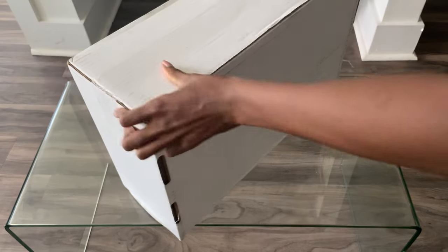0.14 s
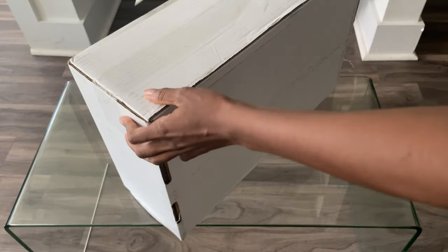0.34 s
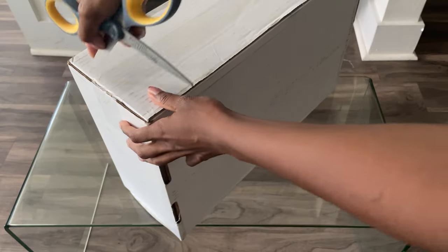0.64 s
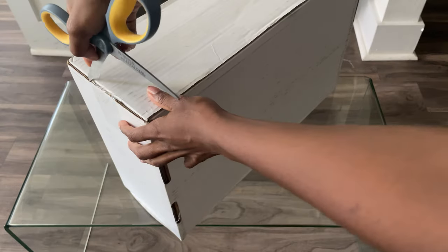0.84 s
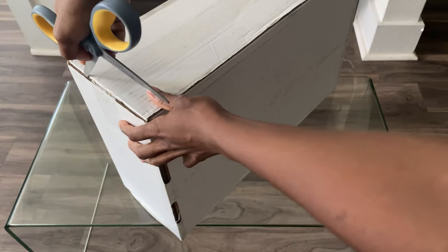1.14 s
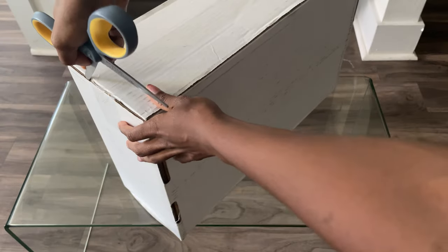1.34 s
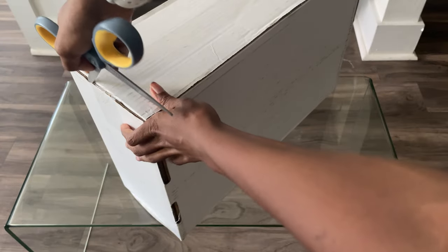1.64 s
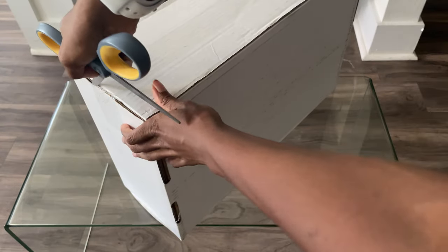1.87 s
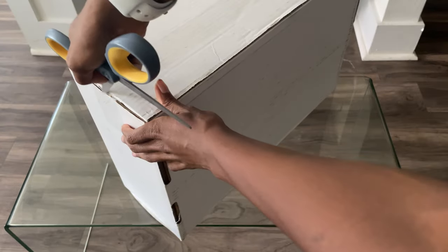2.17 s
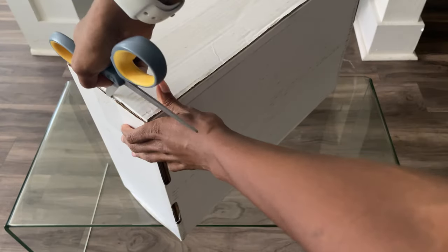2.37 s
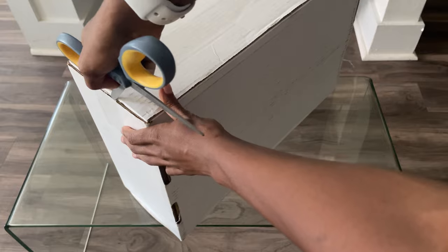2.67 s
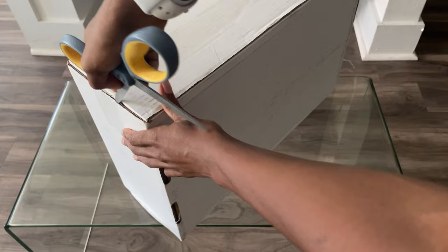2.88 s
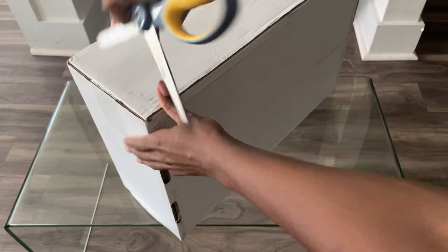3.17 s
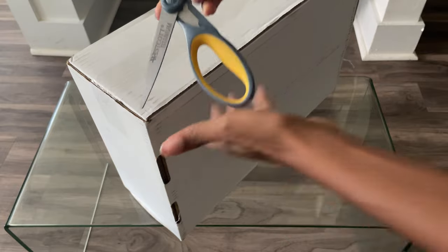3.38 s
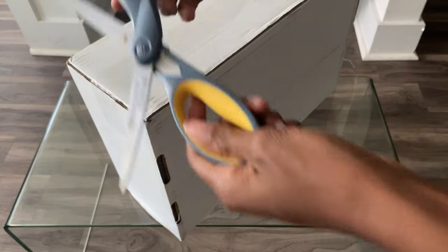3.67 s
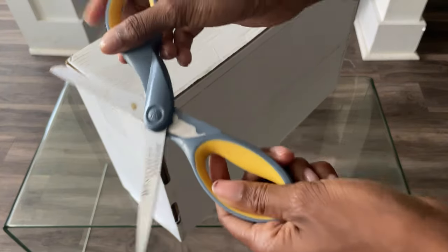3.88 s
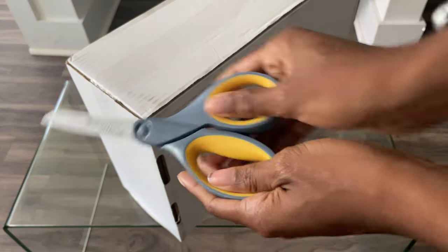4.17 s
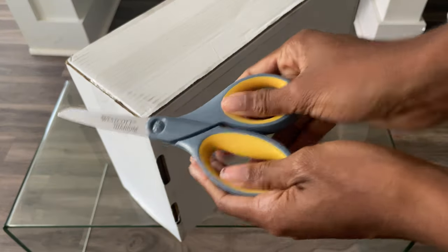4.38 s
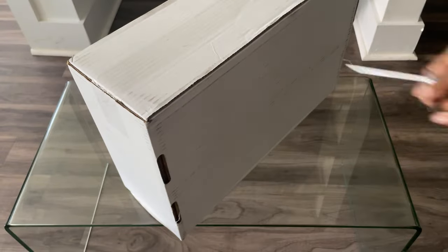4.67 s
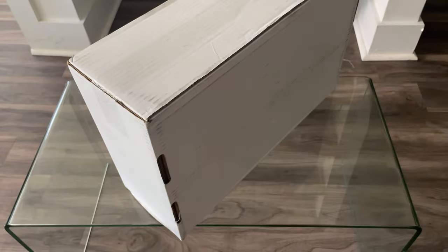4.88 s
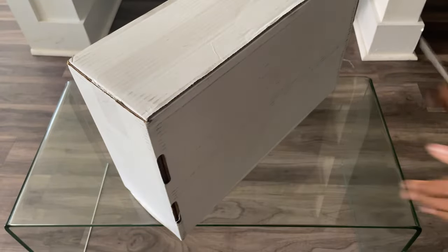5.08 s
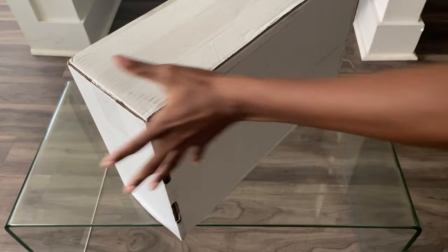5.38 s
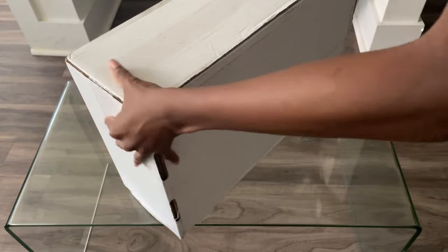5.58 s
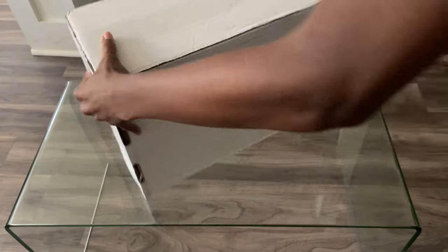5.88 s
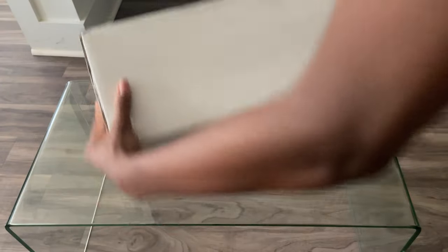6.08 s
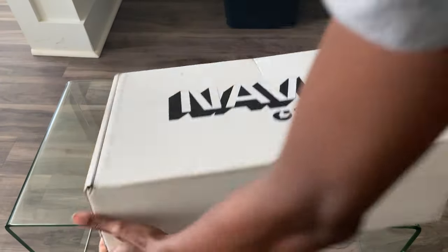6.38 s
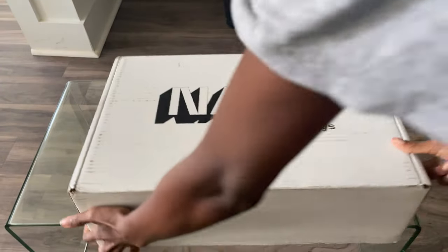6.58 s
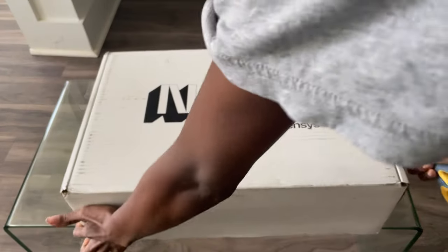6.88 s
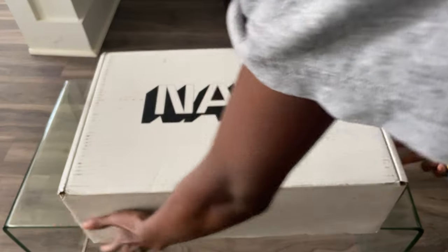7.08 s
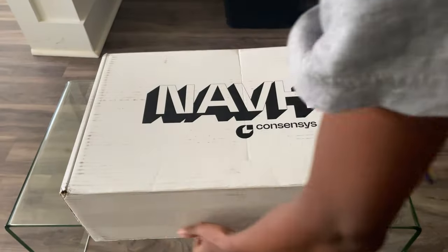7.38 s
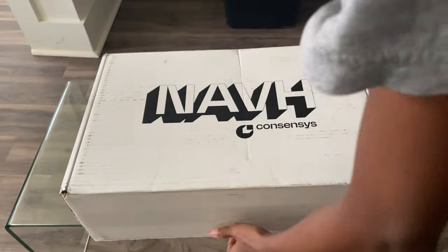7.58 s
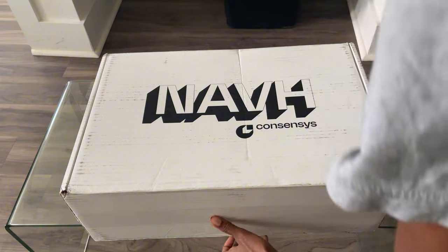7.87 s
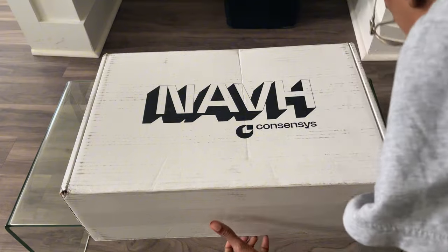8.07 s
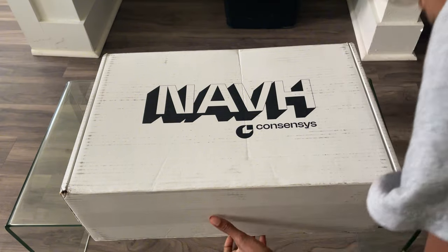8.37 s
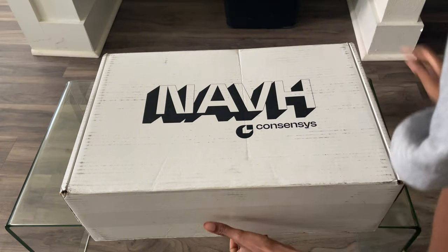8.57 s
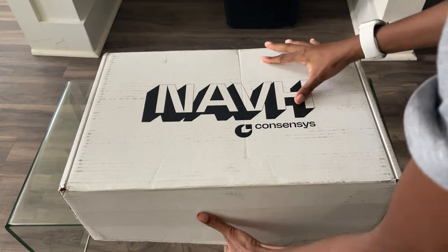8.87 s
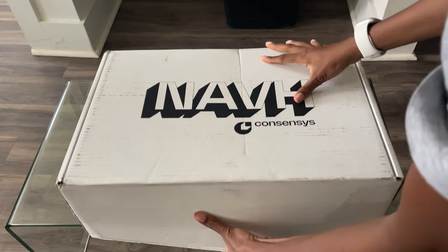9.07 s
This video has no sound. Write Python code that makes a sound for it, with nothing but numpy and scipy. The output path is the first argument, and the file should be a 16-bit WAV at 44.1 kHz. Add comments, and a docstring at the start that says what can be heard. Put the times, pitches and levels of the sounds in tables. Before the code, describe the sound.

Scissor blade rasps and snaps through tape on a cardboard box, scissors snip shut, then the hollow box is tipped, scraped and patted indoors.

```python
"""A small quiet room with a cardboard box on a glass table: a scissor blade saws through the tape, the
scissors snap shut, and hands tip, slide and pat the box. Stick-slip grains and blows drive modal filters for
board, hollow box and blades; clicks are short noise bursts. A faint falling whistle, room echoes, ventilation
noise and a hum surround them, heard by a phone whose two ports sit a little apart."""
import sys
import numpy as np
from scipy import signal
from scipy.fft import rfft, irfft, next_fast_len
from scipy.io import wavfile
from scipy.ndimage import uniform_filter1d

SR = 44100
rng = np.random.default_rng(int(sys.argv[2]) if len(sys.argv) > 2 else 0)


def transcribe(signal):
    """Save signal, clipped to [-1, 1], as a 16-bit WAV file at the path in sys.argv[1]."""
    frames = np.atleast_2d(signal).T
    limited = np.clip(frames, -1, 1)
    pcm = np.round(limited * 32767).astype(np.int16)
    wavfile.write(sys.argv[1], SR, pcm)


N = 407484
T = np.arange(N) / SR
SIZE = next_fast_len(N + SR)


def undb(db):
    """Level law: amplitude is ten to the power dB / 20."""
    return 10 ** (np.asarray(db) / 20)


def unit(x):
    """Normalisation to unit rms."""
    return x / np.sqrt(np.mean(x ** 2))


def over_hz(table):
    """Logarithmic frequency scale: a (frequency, value) table read at every spectral bin."""
    hz, value = np.transpose(table)
    bin_hz = np.arange(1, SIZE // 2 + 2) * SR / SIZE
    return np.interp(np.log(bin_hz), np.log(np.maximum(hz, 1)), value)


def shape(x, gain):
    """Linear filtering: the spectrum is multiplied by a gain."""
    return irfft(rfft(x, SIZE) * gain, SIZE)[..., :N]


def low_pass(x, order, hz):
    """Butterworth low-pass filtering."""
    return signal.sosfilt(signal.butter(order, hz, fs=SR, output="sos"), x)


def flicker(rate, depth_db):
    """Random modulation: a gain that drifts between random levels drawn at the given rate [Hz]."""
    k = int(SR / rate)
    steps = np.repeat(rng.standard_normal(N // k + 1), k)
    return undb(depth_db * uniform_filter1d(steps, k)[:N])


def resonate(x, peaks, patchy_db=0):
    """Modal superposition: two-pole resonances of alternate sign, favoured in turn by a moving contact."""
    out = 0
    for k, (hz, width, db) in enumerate(peaks):
        drive = x * flicker(rate=45., depth_db=patchy_db)
        out = out + (-1) ** k * undb(db) * signal.lfilter(*signal.iirpeak(hz, hz / width, SR), drive)
    return out


def add(out, s, sound):
    """Superposition: a sound is added in place from time s [s]."""
    i = max(int(s * SR), 0)
    out[i:i + len(sound)] += sound[:N - i]


def grains(per_s, scatter_db, smooth):
    """Stick-slip force: random slips of uneven size over a fine even grain."""
    size = undb(scatter_db * np.minimum(rng.exponential(size=N), 2)) * rng.standard_normal(N)
    slips = unit(size * (rng.random(N) < per_s / SR))
    return unit(slips + smooth * rng.standard_normal(N))


# steady handling: (time [s], rubbing of hands and blade on the surface [dB], working of the panels [dB])
HANDLING_CURVE = [(0, -75.5, -68.5), (.14, -72, -66), (.225, -58, -69), (.3, -67, -69.5), (.41, -79, -62),
                  (.46, -92, -77.5), (.82, -86, -63), (1.57, -78, -64.5), (1.67, -72, -61),
                  (2.13, -66, -56.5), (2.42, -70.5, -61.5), (2.68, -87, -75), (2.9, -63, -54.5),
                  (3.05, -83, -66.5), (3.4, -91.5, -75.5), (4.248, -89, -73.5), (4.35, -97, -74),
                  (4.6, -76, -72.5), (4.9, -97, -72.5), (5.4, -84, -74.5), (5.458, -67, -73),
                  (5.6, -72.5, -62), (5.74, -58, -53), (5.94, -67.5, -61), (6.28, -59, -53),
                  (6.45, -67, -53.5), (6.6, -68, -54.5), (6.72, -68, -52.5), (6.77, -100, -67),
                  (7.0, -65.5, -71), (7.2, -68.5, -76), (7.36, -64.5, -61), (7.5, -70, -66.5),
                  (7.59, -75.5, -74.5), (7.9, -71, -68), (8.05, -85.5, -77), (8.2, -93, -58),
                  (8.44, -90, -49.5), (8.57, -100, -52.5), (8.62, -79.5, -59), (8.75, -76.5, -64),
                  (8.85, -61, -51), (9.01, -68, -52.5), (9.14, -70, -48.5), (9.24, -79.5, -79)]
# Strokes share the columns (time [s], peak hiss level [dB], load on the box re hiss [dB],
# decay time to -60 dB [s], rise time [s], optional).
# blade pushed through the tape
BLADE_CUTS = [(1.255, -46, 9, 0.14, .01), (1.572, -33, -6, 0.069, .009), (1.599, -46.5, 6.5, 0.35, .004),
              (1.724, -38, -1.5, 0.2, .016), (1.748, -40, 3, .14, .014), (1.769, -47, 12.5, 0.18, .01),
              (1.894, -46, 4.5, 0.12, .006), (1.923, -37.5, -1, 0.17, .012), (1.96, -48, 3, .3, .02),
              (2.028, -44, -2, 0.2, .004), (2.036, -39, 2, .16, .022), (2.165, -35.5, -1, 0.12, .018),
              (2.3, -44, 1.5, 0.18, .03), (2.43, -46, 4, 0.17, .014), (2.592, -43, 2, 0.12, .016),
              (2.63, -39, 3, 0.13, .021), (2.82, -42, 4, 0.21, .016), (2.869, -48, 8, 0.1, .015),
              (2.948, -43.5, -13, 0.22, .002)]
# hands slipping on the box; the row at 4.495 s is fingers shifting on the scissor handles
HAND_RUBS = [(.042, -49, -18, 0.12), (.149, -69, 15, .17), (.35, -62, 7, .25), (.38, -57.5, 6, 0.23),
             (.39, -52, 5, 0.086, .022), (.896, -59, 5, 0.2), (.915, -57.5, 7.5, 0.18),
             (4.495, -63.5, -10, 1), (5.526, -49.5, 9, 0.11), (5.592, -50, -4, 0.38, .02),
             (5.78, -48, 2, .2, .04), (5.815, -43, 3, .13, .03), (6.175, -51, 4, .3),
             (6.2, -47, 2, 0.32, .02), (6.3, -53, 6, .25), (6.369, -49, 5, 0.16),
             (6.425, -48, 3.5, 0.18, .015), (6.637, -52, 9, .2), (6.654, -48, 4, 0.37),
             (6.68, -49, 2, .12, .02), (6.96, -59.5, 8.5, 0.16), (7.643, -52.5, -3, 0.16),
             (7.847, -50, -13, 0.058), (8.783, -46, 6, 0.25), (9.06, -48, 21.5, 0.13),
             (9.1, -52.5, 24, 0.13)]
# fingers shifting on the scissor handles, thin and bright
FINGER_GRIPS = [(3.139, -68, -7, 0.98), (3.639, -81.5, 12, 0.56, .01), (3.93, -76, 3.5, 1, .02),
                (4.86, -78, -1, 0.48, .01), (5.0, -79, 1.5, 0.7, .02)]
# dull scrapes and rubs without sizzle, short and long; their hiss column sets the judder
DULL_SCRAPES = [(7.25, -63, 11.5, 0.4), (7.3, -61, 5, 0.36), (7.35, -58, 10.5, 0.18),
                (8.062, -38.5, -5.5, 0.37), (8.16, -54, 2, 1), (8.269, -39, 5, 0.35),
                (8.357, -41, 7, 0.082), (8.374, -33.5, -15, 0.32), (8.4, -41, 4.5, .3),
                (8.44, -43.5, 6.5, 0.43), (8.475, -48.5, 12, 0.38, .025), (8.53, -51.5, 10.5, 0.26),
                (8.93, -53, -5, 0.18), (8.955, -52, -7, 0.092), (9.038, -47.5, -2, .1)]
# per kind: (lag of the panels [s], sizzle re hiss [dB], rasp re hiss at no load [dB], rasp per load [dB/dB])
CUT_KIND, RUB_KIND = (.01, -0.5, -9, 0.74), (.002, 0.5, -2, 0.85)
GRIP_KIND, DULL_KIND = (.001, 11.5, 3, 1), (.002, -30, 3, 0.46)
RISE_S = .003  # where a row gives none
CREST_DB = 9  # peak over rms of a slipping contact
RUB_SIZZLE_DB, PANEL_RASP_DB = 2, -5.5  # sizzle re rubbing; rasp re the mean of both controls


def contact_powers():
    """Addition of powers: handling and strokes sum to six rows, hiss, sizzle, rasp, rumble, judder, boom."""
    s, rub_db, panel_db = np.transpose(HANDLING_CURVE)
    rasp_db = (rub_db + panel_db) / 2 + PANEL_RASP_DB
    steady = [undb(2 * np.interp(T, s, db)) for db in (rub_db, rub_db + RUB_SIZZLE_DB, rasp_db, panel_db)]
    power = np.vstack([steady, np.zeros((2, N))])
    hiss, sizzle, rasp, rumble, judder, boom = power
    surface, dull = (hiss, sizzle, rasp, rumble), (judder, sizzle, rasp, boom)
    for table, kind, rows in ((BLADE_CUTS, CUT_KIND, surface), (HAND_RUBS, RUB_KIND, surface),
                              (FINGER_GRIPS, GRIP_KIND, surface), (DULL_SCRAPES, DULL_KIND, dull)):
        lag, sizzle_db, rasp_db, per_load = kind
        for start, db, load_db, t60, *slow in table:
            rise = max(sum(slow) or RISE_S, .001)
            t = np.arange(int((rise + t60) * SR)) / SR
            swell = np.minimum(t / rise, 1) ** 2 * undb(-120 * np.maximum(t - rise, 0) / t60)
            shares_db = (0, sizzle_db, rasp_db + per_load * load_db, load_db)
            for row, share_db, late in zip(rows, shares_db, (0, 0, 0, lag)):
                add(row, start + late, swell * undb(2 * (db + share_db - CREST_DB)))
    return power


# spectrum of fibre hiss: (frequency [Hz], relative level per Hz [dB])
FIBRE_SPECTRUM = [(1200, -3), (1700, -2), (2300, 1), (3000, -2), (4500, -3), (6000, -3.5), (7500, -5.5),
                  (9000, -1.5), (12000, -18.5)]
# spectrum of the bright sizzle: (frequency [Hz], relative level per Hz [dB])
SIZZLE_SPECTRUM = [(5000, -23), (7000, -10.5), (8500, -6.5), (11000, 0), (13500, 3), (16000, 0)]


def hiss_and_sizzle():
    """Stick-slip at the surface: one train of fine slips feeds both the fibre hiss and the sizzle."""
    snaps = grains(per_s=400., scatter_db=1.5, smooth=0.035)  # a few fibres break loudly
    fine = grains(per_s=3000., scatter_db=0.5, smooth=1.48)
    slips = (fine + 0.35 * snaps) * flicker(rate=70., depth_db=2.0)
    hiss = unit(shape(slips, undb(over_hz(FIBRE_SPECTRUM))))
    sizzle = unit(shape(slips, undb(over_hz(SIZZLE_SPECTRUM)))) * flicker(rate=140.0, depth_db=2.0)
    return hiss, sizzle


# modes of the board: (frequency [Hz], width [Hz], relative level [dB])
BOARD_MODES = [(534, 123, 2), (627, 150, 1), (770, 170, -1.5), (995, 163, -1), (1170, 280, -4),
               (1450, 267, -5), (1815, 480, -5), (2210, 820, -4.5), (2950, 570, -4)]


def board_rasp():
    """Forced modal vibration: coarse slips in the middle register excite the board."""
    crunch = grains(per_s=900., scatter_db=1.0, smooth=0.9) * flicker(rate=83.0, depth_db=1.5)
    middle = signal.butter(2, [420, 1900], "band", fs=SR, output="sos")
    return unit(resonate(signal.sosfilt(middle, crunch), BOARD_MODES, patchy_db=3.0))


# modes of the hollow box, also rung by the knocks: (frequency [Hz], width [Hz], relative level [dB])
BOX_MODES = [(68, 16, -2), (98.7, 23, 2), (139, 25, -2), (198, 36, -2), (255.6, 37.6, -1), (322.6, 29, -3),
             (390, 37, -7.5), (464.6, 67, -8.5)]


def box_rumble():
    """Low-frequency forced vibration: only the slow part of the force moves the large panels."""
    heave = low_pass(grains(per_s=330.0, scatter_db=2.0, smooth=1.18), 2, 650)
    return unit(resonate(heave, BOX_MODES, patchy_db=3.5))


# spectrum of the box edge on glass: (frequency [Hz], relative level per Hz [dB])
JUDDER_SPECTRUM = [(1500, -1), (2300, -6), (3000, -4.5), (3900, -1), (5100, -4.5), (6500, -7), (8000, -9.5),
                   (12000, -18), (16000, -28)]


def edge_judder():
    """Stick-slip of the box edge on glass: dense slips with a falling treble."""
    slips = grains(per_s=2500., scatter_db=-2.0, smooth=1.2)
    return unit(shape(slips, undb(over_hz(JUDDER_SPECTRUM)))) * flicker(rate=60., depth_db=2.5)


def friction():
    """Amplitude modulation: the root of each contact power scales its friction texture."""
    power = contact_powers()
    hiss, sizzle = hiss_and_sizzle()
    rasp = board_rasp()
    rumble = box_rumble()
    judder = edge_judder()
    boom = unit(low_pass(rumble, 4, 188))  # the lowest part of the rumble, for the dull scrapes
    return np.sum(np.sqrt(power) * [hiss, sizzle, rasp, rumble, judder, boom], axis=0)


def surge(start, peak, db, rise, fall):
    """Exponential growth and decay: straight dB slopes up to a peak and down from it."""
    return (T > start) * undb(db - np.where(T < peak, rise * (peak - T), fall * (T - peak)))


# blades sliding over each other: (time [s], force level [dB])
BLADE_SLIDE = [(4.08, -70), (4.103, -57), (4.112, -46), (4.128, -49), (4.14, -43), (4.151, -28),
               (4.162, -45.5), (4.2, -54.5), (4.24, -61), (4.32, -73)]
# modes of the blades: (frequency [Hz], width [Hz], relative level [dB])
BLADE_MODES = [(1500, 140, -10), (1750, 150, -4), (1970, 160, -3), (2370, 170, -5.5), (2640, 140, -2.5),
               (3020, 150, -8), (3450, 230, -5), (3750, 200, -6), (4060, 180, -4), (5210, 170, 1.5),
               (5850, 230, 0.5), (6500, 220, -6), (7400, 990, -3), (13000, 7100, -7)]
# ping of the handles at the stop: (frequency [Hz], width [Hz], relative level [dB])
HANDLE_MODE = [(800, 90, -21)]
# the pivot rasps first: (start [s], peak time [s], peak level [dB], rise [dB/s], fall [dB/s])
PIVOT_SURGE = (3, 4, -71.5, 117, 700)
# resonance of the pivot: (frequency [Hz], width [Hz], relative level [dB])
PIVOT_MODE = [(3280, 860, 0)]
# the edges catch: (start [s], peak time [s], peak level [dB], rise [dB/s], fall [dB/s])
EDGE_SURGE = (4.1, 4.121, -58, 900, 200)
# resonance of the caught edges: (frequency [Hz], width [Hz], relative level [dB])
EDGE_MODE = [(1530, 160, 0)]
SNIP_S, SNIP_DB = 4.156, -6  # time and strength of the impulse at the stop


def snip():
    """Impulse response of the blades: pivot and edges rasp, the blades grind, meet their stop and ring."""
    force = grains(per_s=2500.0, scatter_db=1.5, smooth=0.8)
    stop = undb(SNIP_DB) * (np.arange(N) == int(SNIP_S * SR))
    rasp = surge(*PIVOT_SURGE) * unit(resonate(resonate(force, PIVOT_MODE), PIVOT_MODE))
    squeal = surge(*EDGE_SURGE) * unit(resonate(force, EDGE_MODE))
    # closed blades rattle on dully
    spent = unit(signal.lfilter(*signal.butter(1, 3000, fs=SR), force))
    force = np.where(T < SNIP_S, force, spent)
    slide = force * undb(np.interp(T, *np.transpose(BLADE_SLIDE), left=-200, right=-200))
    ring = resonate(slide + stop, BLADE_MODES, patchy_db=4.0)
    return ring + 10 * resonate(stop, HANDLE_MODE) + rasp + squeal


# soft blows on the panels: (time [s], push level [dB], push frequency [Hz])
PANEL_BLOWS = [(.116, -45, 360), (.152, -47, 306), (0.737, -45.5, 380), (0.741, -40, 200), (.91, -52, 207),
               (1.266, -37, 115), (1.275, -42, 260), (1.594, -40, 141), (1.765, -40, 260),
               (1.774, -39, 250), (1.787, -42, 240), (1.902, -45, 260), (2.053, -39, 238),
               (2.064, -40, 230), (2.186, -39, 132), (2.196, -41, 200), (2.616, -44, 200),
               (2.652, -40, 126), (2.663, -39, 170), (3.072, -47, 70.5), (3.094, -42.5, 70.5),
               (3.13, -50, 75), (5.427, -44.5, 206), (5.526, -39, 263), (5.543, -28.5, 238),
               (5.618, -32.5, 309), (5.628, -32, 90), (5.848, -47, 90), (5.982, -46, 249),
               (5.996, -38.5, 480), (6.006, -41, 422), (6.252, -43, 260), (6.269, -40.5, 90),
               (6.309, -43, 300), (6.458, -46, 280), (6.527, -47, 350), (6.545, -45, 240),
               (6.596, -46, 330), (7.837, -46, 113), (8.068, -41, 142), (8.272, -32, 142),
               (8.283, -30, 130), (8.3, -34, 130), (8.358, -35, 150), (8.367, -30, 134), (8.387, -31, 125),
               (8.415, -35, 130), (8.796, -25, 253), (8.803, -28, 280), (8.81, -15, 200), (8.825, -30, 253),
               (8.84, -36, 260), (8.859, -40, 107), (8.905, -36, 230), (8.993, -39, 260), (9.059, -36, 520),
               (9.065, -28.5, 250), (9.07, -37, 80), (9.077, -29.5, 237), (9.091, -28.5, 310),
               (9.098, -34, 420), (9.114, -31, 300), (9.132, -35, 480), (9.146, -36, 260)]
KNOCK_CYCLES = 1.7  # length of a push


def knocks(ring_db=-3.5):
    """Transient excitation: each blow is a short swing of the panel, which sets the hollow box ringing."""
    push = np.zeros(N)
    for s, db, hz in PANEL_BLOWS:
        phase = np.arange(int(KNOCK_CYCLES * SR / hz)) * hz / SR
        add(push, s, -undb(db) * np.sin(np.pi * phase / KNOCK_CYCLES) * np.sin(2 * np.pi * phase))
    return push + undb(ring_db) * resonate(push, BOX_MODES)


# fibre and tape snaps, finger-nail ticks: (time [s], peak level [dB], centre frequency [Hz])
SNAPS_AND_TICKS = [(.042, -41, 9000), (.06, -38.5, 9000), (.052, -44, 6000), (.084, -50, 1300),
                   (.089, -52, 3000), (.116, -46, 850), (.153, -54, 900), (.409, -50, 1200),
                   (.413, -50, 2800), (.736, -55.5, 1160), (.808, -60.5, 2700), (1.263, -43, 4120),
                   (1.432, -46.5, 10000), (1.494, -46, 10000), (1.514, -42, 11000), (1.521, -48, 10000),
                   (1.556, -44, 11000), (1.582, -23, 10300), (1.67, -42, 11500), (1.898, -42, 8900),
                   (2.028, -33.5, 7040), (2.156, -31.5, 10000), (2.162, -27.5, 10000), (2.179, -33.5, 4620),
                   (2.609, -46, 5000), (2.649, -40, 6040), (2.768, -51, 11500), (2.795, -47, 11600),
                   (2.838, -44, 6000), (2.949, -29, 4640), (3.007, -41, 11000), (3.295, -57, 1480),
                   (3.43, -62.5, 2280), (4.596, -50, 6000), (5.426, -50, 1090), (5.528, -44, 2570),
                   (5.614, -43, 1370), (5.896, -46, 1270), (5.994, -36, 980), (6.004, -41, 834),
                   (6.31, -44, 890), (6.325, -51, 1400), (6.44, -51, 2300), (6.456, -48, 2200),
                   (6.55, -45, 2600), (6.577, -44, 1700), (6.639, -42.5, 4500), (6.657, -40.5, 5500),
                   (6.7, -45.5, 2400), (7.847, -47, 1600), (8.064, -36, 3450), (8.271, -33, 1210),
                   (8.273, -35.5, 4000), (8.303, -40, 5000), (8.356, -34, 900), (8.357, -42, 4700),
                   (8.376, -18.5, 5130), (8.776, -46, 5000), (8.787, -39, 2200), (8.795, -32, 960),
                   (8.806, -35.5, 1200), (8.413, -38, 650), (8.453, -40, 500), (8.529, -41, 600),
                   (8.9, -47, 1200), (8.992, -37.5, 1630), (9.066, -34, 1930), (9.091, -33, 1790),
                   (9.114, -33.5, 1500), (9.133, -44, 880), (9.154, -43.5, 7100)]
TICK_T60_S, TICK_SHORTENS = 0.019, 0.23  # decay at 1 kHz; power of pitch by which it shortens
TICK_SHARPNESS, TICK_ROOF = 0.81, 1.73  # centre over width; little sounds above this multiple of the centre


def ticks():
    """Damped impulsive noise: a click with a ragged tail round its centre; higher ones decay sooner."""
    out = np.zeros(N)
    rag = rng.standard_normal((len(SNAPS_AND_TICKS), 2048))
    for (s, db, hz), noise in zip(SNAPS_AND_TICKS, rag):
        noise = np.concatenate([[3.0], noise[1:]])  # a hard first contact
        burst = noise * undb(-60 * T[:2048] / TICK_T60_S * (hz / 1000) ** TICK_SHORTENS)
        for _ in range(2):
            burst = signal.lfilter(*signal.iirpeak(hz, TICK_SHARPNESS, SR), burst)
        burst = signal.lfilter(*signal.butter(3, min(TICK_ROOF * hz, .45 * SR), fs=SR), burst)
        add(out, s, undb(db) * burst / np.abs(burst).max())
    return out


# a faint falling whistle: (time [s], length [s], start frequency [Hz], level before the port gains [dB])
WHISTLE_CALLS = [(0.801, .45, 3370, -83.5), (2.48, .22, 3420, -89), (4.3, 0.41, 3420, -87)]
WHISTLE_END_HZ, WHISTLE_SINKS_S = 3000, .25  # pitch approached, time constant
WHISTLE_FADE_DB = 13  # depth of the fade at both ends


def whistle(warble_db=3.0, waver_hz=55.):
    """Frequency modulation: a thin rough tone swells, sinks exponentially in pitch and flutters."""
    out = np.zeros(N)
    waver = waver_hz * unit(uniform_filter1d(rng.standard_normal(N), size=150))
    for s, length, hz, db in WHISTLE_CALLS:
        t = T[:int(length * SR)]
        sinking = WHISTLE_END_HZ + (hz - WHISTLE_END_HZ) * np.exp(-t / WHISTLE_SINKS_S)
        pitch = sinking + np.interp(s + t, T, waver)
        swell = undb(db - WHISTLE_FADE_DB * ((2 * t / length - 1) ** 6 + t / length / 5))
        add(out, s, swell * np.sqrt(2) * np.sin(2 * np.pi * np.cumsum(pitch) / SR))
    return out * flicker(rate=82.0, depth_db=warble_db) * flicker(rate=25., depth_db=3.5)


ROOM_T60_S, ROOM_TREBLE_T60_S, ROOM_DB = 0.48, 0.22, -9.5


def echoes(x, glance_db, gap_s=0.0025):
    """Reverberation by convolution: a tail whose treble dies first, and glances off the table."""
    t, step, out = T[:SR // 2], SR // 4, np.zeros(N)
    # overlapping parts take fresh paths, as box and arms move
    for i in range(-step, N, step):
        noise = rng.standard_normal(len(t))
        low = low_pass(noise, 1, 2500)
        tail = low * undb(-60 * t / ROOM_T60_S) + (noise - low) * undb(-60 * t / ROOM_TREBLE_T60_S)
        tail = tail * np.minimum(t / gap_s, 1)
        glance = noise * undb(-60 * t / 0.01)
        paths = undb(ROOM_DB) * tail / np.linalg.norm(tail)
        paths = paths + undb(glance_db) * glance / np.linalg.norm(glance)
        part = x[max(i, 0):i + 2 * step] * np.hanning(2 * step)[max(-i, 0):N - i]
        add(out, i / SR, signal.fftconvolve(part, paths))
    return out


# spectrum of the ventilation noise: (frequency [Hz], relative level per Hz [dB])
AIR_SPECTRUM = [(12, -42), (20, -21), (49, 11.5), (123, -2), (172, -4), (408, -24), (655, -43.5),
                (1280, -19), (2880, -40.5), (6650, -41), (8550, -70), (9300, -62), (11600, -49),
                (13000, -58), (15800, -56)]
AIR_DB, HUM_HZ, HUM_DB = -63.5, 117.9, -66


def room_air():
    """Stationary broadband noise: slightly wavering ventilation in two independent parts, the first with hum."""
    air = shape(rng.standard_normal((2, N)), undb(over_hz(AIR_SPECTRUM)))
    air = undb(AIR_DB) * unit(air) * flicker(rate=12.0, depth_db=-0.5)
    hum = undb(HUM_DB) * np.sqrt(2) * np.sin(2 * np.pi * HUM_HZ * T)
    air[0] += hum * flicker(rate=4.8, depth_db=-1.5)
    return air


# weight of the part unlike at the two ports: (frequency [Hz], gain [dB])
UNLIKE_GAIN = [(60, -18.5), (200, -16), (400, -9), (700, 1), (1300, -3.5), (2500, -4), (5000, -2.5),
               (9000, -13), (16000, -5.5)]


def scene():
    """Decorrelation of a sound field: a shared part plus an unlike one of opposite sign at the two ports."""
    near = friction() + knocks() + ticks() + snip()
    air, far = room_air(), whistle()
    shared = near + echoes(near, glance_db=-17.5) + air[0]
    # table and walls reach the two ports by different paths, most of all in the middle register
    unlike = shape(echoes(near, glance_db=1.55) + 2.55 * air[1], undb(over_hz(UNLIKE_GAIN)))
    # the whistle comes from the left
    return np.array([shared + unlike + 2.34 * far, shared - unlike + 1.16 * far])


# phase between the ports: (frequency [Hz], lead of the left [rad])
PHASE_LEAD = [(0, 0), (430, -0.1), (780, -2.3), (1030, 0.0), (2150, -0.0), (6980, -0.6), (7840, 2.9),
              (9130, 3.7), (10300, 6.1), (11500, 6.7), (12800, 9.4), (13700, 9.5), (14700, 12.2),
              (16400, 12.7)]
# level between the ports: (frequency [Hz], left minus right [dB])
LEVEL_BALANCE = [(60, 2), (110, 2), (200, 2), (380, 0), (700, 0.5), (1290, 0), (2380, 0.5), (4400, -2),
                 (8120, -0.5), (15000, 0)]
# overall tone of the sound, which closes near 16 kHz: (frequency [Hz], gain [dB])
OVERALL_TONE = [(25, -2), (45, 0.5), (15650, -0.5), (15950, -21), (16500, -35)]
TOP_HZ = 16800


def record(dry):
    """Transfer functions: the ports differ in phase and level; the sound is dull above about 16 kHz."""
    half = undb(over_hz(LEVEL_BALANCE) / 2) * np.exp(.5j * over_hz(PHASE_LEAD))
    ports = shape(dry, np.array([half, 1 / half]) * undb(over_hz(OVERALL_TONE)))
    return signal.sosfilt(signal.ellip(10, .2, 70, TOP_HZ, fs=SR, output="sos"), ports)


dry = scene()
out = record(dry)
transcribe(out)
```